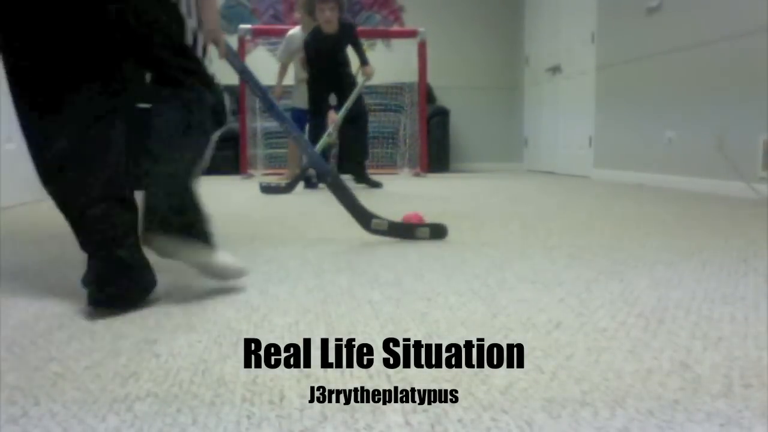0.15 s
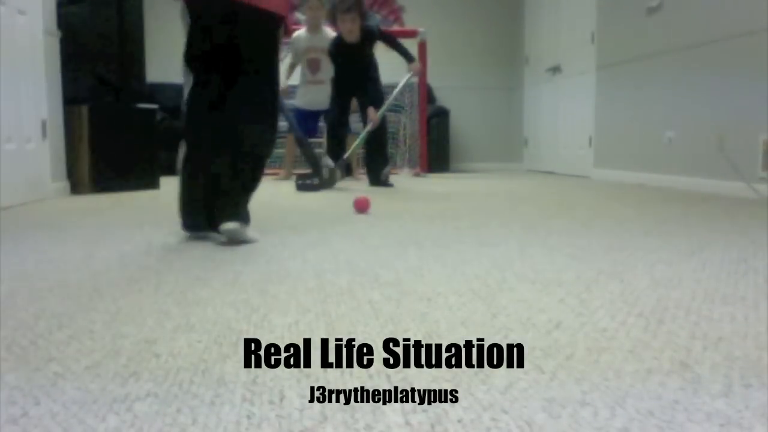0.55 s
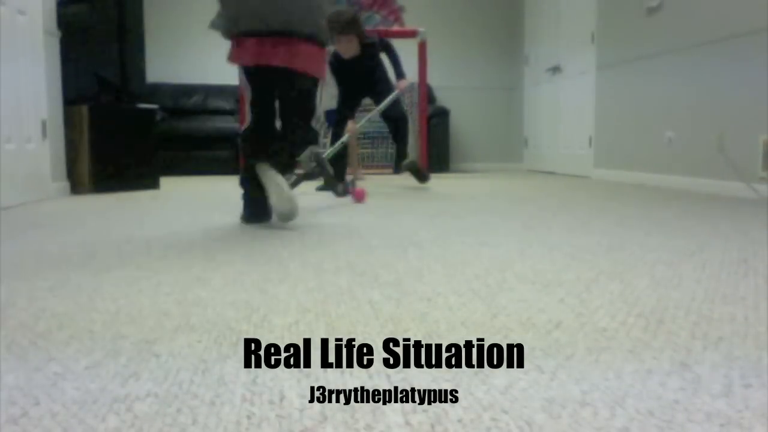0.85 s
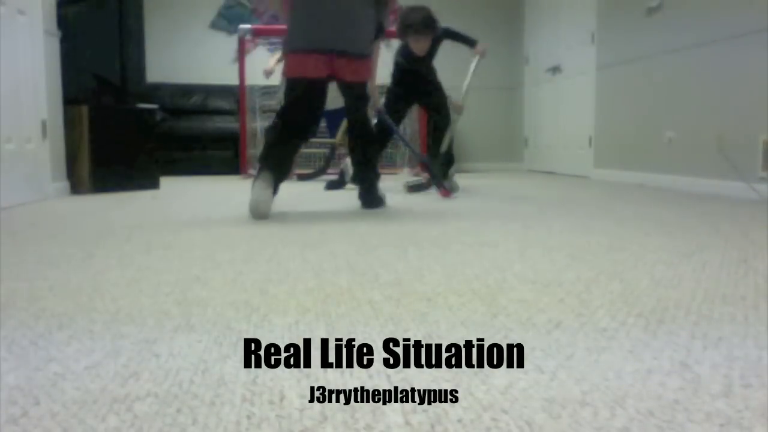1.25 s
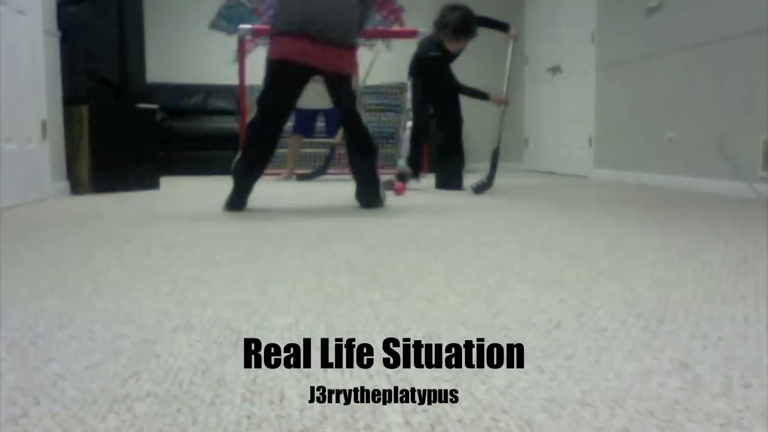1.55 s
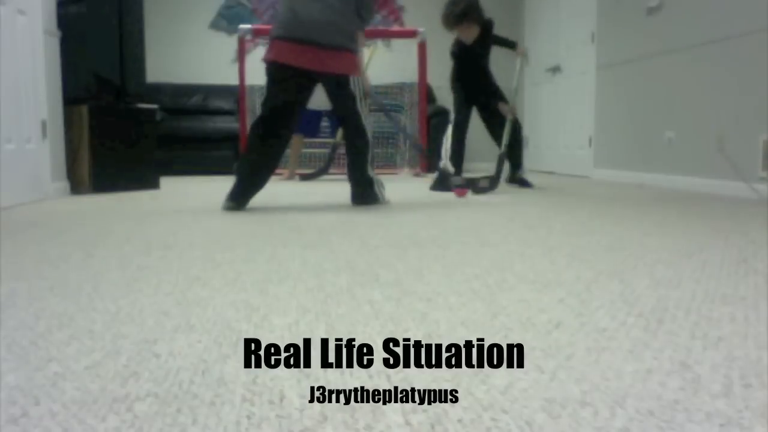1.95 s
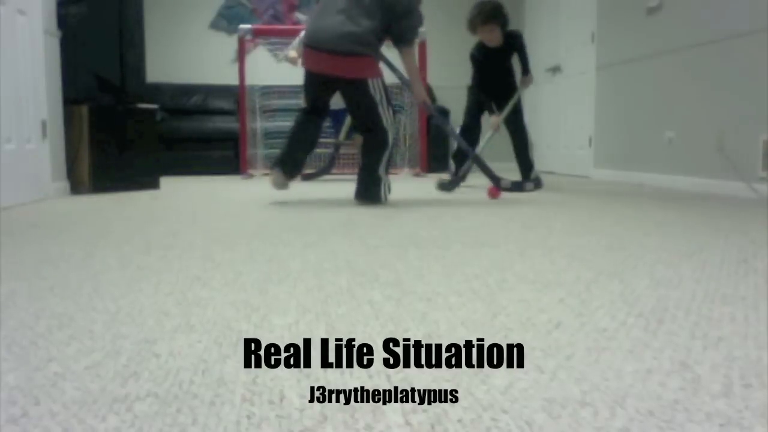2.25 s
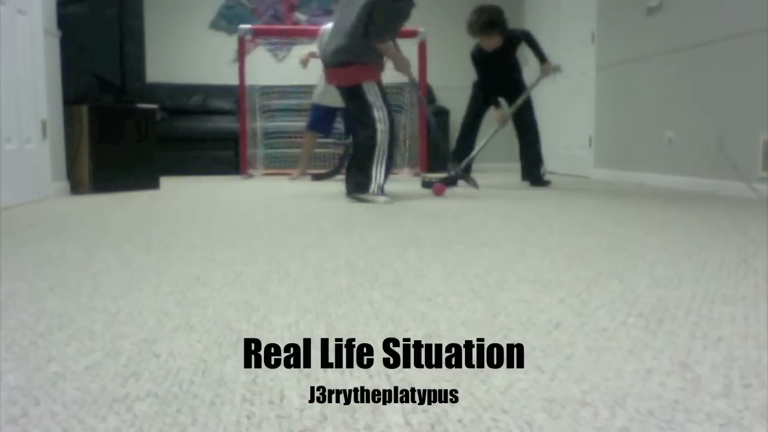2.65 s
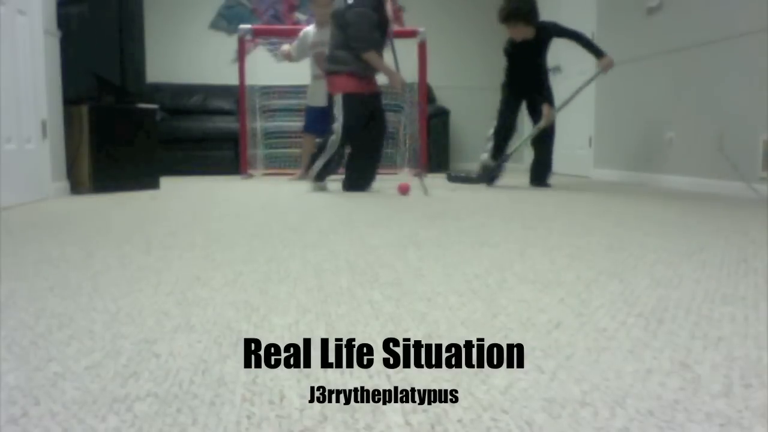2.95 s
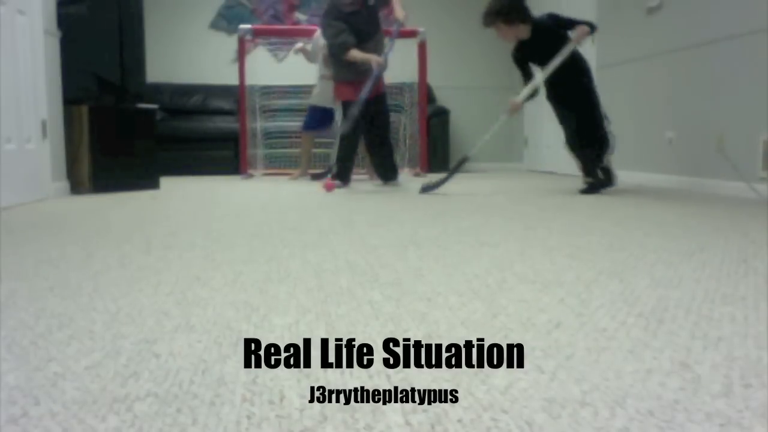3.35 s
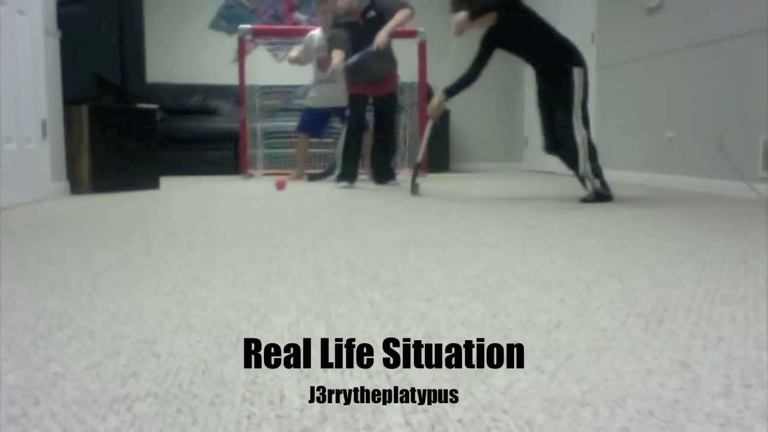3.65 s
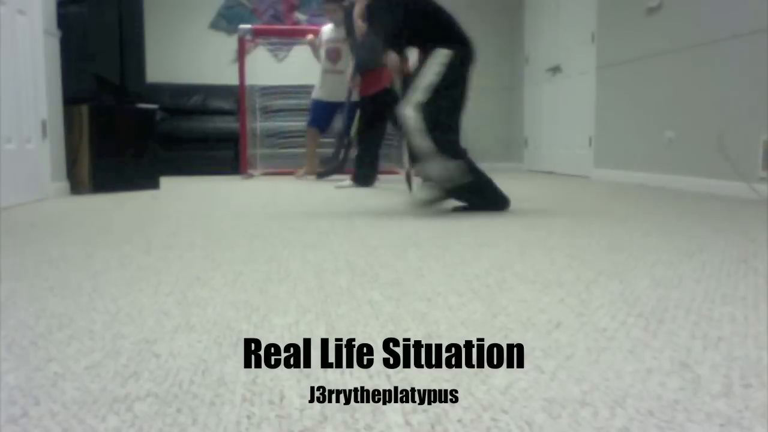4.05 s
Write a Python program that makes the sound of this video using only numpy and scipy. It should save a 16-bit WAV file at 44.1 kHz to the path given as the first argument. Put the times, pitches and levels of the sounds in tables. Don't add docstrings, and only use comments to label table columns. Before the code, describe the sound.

A small microphone on the floor of a carpeted room picks up floor hockey. Two quick clusters of plastic clacks and floor slaps come first, then a thin tick, a foot thud with clacks, and a hit on a light ball. A quieter stretch of soft scuffing follows, with a light double tap, before one very loud plastic clash and a heavy stomp close it.

```python
import sys
import numpy as np
from scipy import signal
from scipy.fft import rfft, irfft
from scipy.io import wavfile

SR = 44100
rng = np.random.default_rng(int(sys.argv[2]) if len(sys.argv) > 2 else 0)


def volts(x):
    e = np.asarray(x, float) / 20
    return 10 ** e


def dump_mix(stems):
    frames = np.atleast_2d(stems).T
    limited = np.clip(frames, -1, 1)
    pcm = np.round(limited * 32767).astype(np.int16)
    wavfile.write(sys.argv[1], SR, pcm)


N = 184645


def at_hz(points, hz):
    table_hz, values = np.transpose(points)
    return np.interp(np.log(hz + 1), np.log(table_hz), values)


def rms_one(x):
    return x / np.sqrt(np.mean(x ** 2) + 1e-20)


def energy_one(x):
    return x / np.sqrt(np.sum(x ** 2) + 1e-20)


def drift(rate_hz):
    pole = np.exp(-80 * np.pi * rate_hz / SR)
    draws = rng.standard_normal(N // 40 + 2002)
    slow = signal.lfilter([1], [1, -2 * pole, pole * pole], draws)[2000:]
    return np.interp(np.arange(N) / 40, np.arange(len(slow)), rms_one(slow))


def colour(x, spectrum):
    hz = np.fft.rfftfreq(len(x), 1 / SR)
    return irfft(rfft(x) * volts(at_hz(spectrum, hz)), len(x))


def band(x, low_hz, high_hz):
    edges = [low_hz, min(high_hz, 0.45 * SR)]
    return signal.sosfilt(signal.butter(2, edges, "band", fs=SR, output="sos"), x)


def patchy_noise(spectrum, patchy_db, rate_hz):
    edges = np.geomspace(spectrum[0][0], spectrum[-1][0], 9)
    noise = [colour(draw, spectrum) for draw in rng.standard_normal((2, N))]
    together = drift(rate_hz)
    out = np.zeros(N)
    for k, (low, high) in enumerate(zip(edges, edges[1:])):
        flicker_db = patchy_db * (together + 0.91 * drift(2 * rate_hz))
        out += band(noise[k % 2], low, high) * volts(flicker_db)
    return rms_one(out)


def standing_waves(x):
    # (frequency [Hz], t60 [s])
    room_modes = [(86, 0.37), (110, 0.31), (175, 0.32), (233, 0.24), (283, 0.96), (336, 0.28), (385, 0.43),
                  (480, 0.35), (590, 0.11)]
    out = np.zeros(len(x))
    for k, (hz, t60) in enumerate(room_modes):
        out += (-1) ** k * signal.lfilter(*signal.iirpeak(hz, hz * t60 / 1.75, fs=SR), x)
    return out


def room_echo(fade_s, build_up_s, sparse_db):
    # (frequency [Hz], t60 [s])
    room_t60 = [(100, 0.81), (300, 0.17), (700, 0.15), (1500, 0.38), (3000, 0.32), (6000, 0.42),
                (10000, 0.15), (15000, 0.19)]
    size = 12000
    t = np.arange(size) / SR
    uneven = volts(sparse_db * np.exp(-t / 0.048) * np.minimum(rng.exponential(1, size), 4))
    build_up = 1 - np.exp(-(t / build_up_s) ** 2)
    reflections = rng.standard_normal((2, size)) * uneven * build_up
    edges = np.geomspace(50, 18000, 10)
    out = np.zeros(size)
    for k, (low, high) in enumerate(zip(edges, edges[1:])):
        decay_db = -60 * t / at_hz(room_t60, np.sqrt(low * high))
        suppressed_db = -20 * (t / fade_s * (high / 5000) ** 0.41) ** 2.63
        out += band(reflections[k % 2], low, high) * volts(decay_db + suppressed_db)
    return energy_one(out)


def ring(hz, t60, rise_s):
    t = np.arange(2048) / SR
    return np.sin(2 * np.pi * hz * t) * volts(-60 * t / t60) * (1 - np.exp(-(t / rise_s) ** 2))


def add(out, s, sound, room_db, build_up_s):
    fade_s = 0.12 * (np.max(np.abs(sound)) / 0.027 + 0.011) ** 0.42
    heard = volts(room_db) * signal.fftconvolve(sound, room_echo(fade_s, build_up_s, sparse_db=6.0))
    heard[:len(sound)] += sound
    i = round(s * SR)
    out[i:i + len(heard)] += heard[:N - i]


def padded_blows(blows):
    out = np.zeros(N)
    for s, level_db, hz, t60, overtone_db, room_db in blows:
        low_mode = ring(hz, t60, rise_s=0.66 / hz)
        overtone = ring(1.95 * hz, 0.61 * t60, rise_s=0.51 / hz)
        blow = low_mode + volts(overtone_db) * overtone
        add(out, s, volts(level_db + 3) * blow, room_db, build_up_s=0.0047)
    with_room = out + volts(-4.0) * standing_waves(out)
    return band(band(with_room, 60, 910), 51, 1200)


def plastic_hits(hits, room_db):
    # (frequency [Hz], density [dB per Hz])
    snap = [(1530, -2), (2600, -4), (2930, -3), (3380, 0), (3700, -2), (4230, 0.5), (5460, -1),
            (6160, -7.5), (6900, -6), (9660, -16), (13500, -22), (15600, -15)]
    out = np.zeros(N)
    hz_axis = np.fft.rfftfreq(2048, 1 / SR)
    for s, clack_db, hz, crack_db, tilt_db in hits:
        clack = ring(hz, 0.0034, rise_s=0.00053) + 0.5 * ring(1.355 * hz, 0.0044, rise_s=0.00056)
        top_loss_db = 4.5 * min(crack_db + 17, 0) * np.log2(np.maximum(hz_axis / 11500, 1))
        tilted_db = tilt_db * np.log2(hz_axis / 7000 + 0.078)
        shape = volts(at_hz(snap, hz_axis) + tilted_db + top_loss_db)
        shape = shape / (1 + (0.62 * hz / (hz_axis + 1)) ** 9)
        crack = energy_one(np.roll(irfft(shape), 48))
        hit = volts(clack_db + 6.0) * clack + volts(crack_db + 14) * crack
        add(out, s, hit, room_db, build_up_s=0.0009)
    return band(out, 600, 19000)


def footfall_rumble():
    # (frequency [Hz], density [dB per Hz])
    rumble_spectrum = [(15, -70), (25, -51), (74, -4.5), (204, -6.5), (237, 2), (284, -11), (330, -3),
                       (437, -16), (550, -21.5), (660, -19), (1300, -31.5), (1690, -46), (2860, -120)]
    # (time [s], level [dB])
    footfall = [(0.0, -57), (0.35, -57), (0.62, -63), (0.91, -60), (1.23, -61.5), (1.4, -58), (1.7, -59),
                (1.95, -64.5), (2.15, -64), (2.44, -60), (2.86, -68), (3.22, -56), (3.68, -59.5),
                (3.91, -62.5), (4.1, -54)]
    shake = patchy_noise(rumble_spectrum, patchy_db=2.5, rate_hz=9.4)
    level_db = np.interp(np.arange(N) / SR, *np.transpose(footfall))
    return volts(level_db) * rms_one(shake + volts(1.5) * standing_waves(shake))


def carpet_and_cloth():
    # (frequency [Hz], density [dB per Hz])
    brush_spectrum = [(530, 6), (900, -9), (986, -5), (1200, -9.5), (1360, -1), (2760, 0.5), (4300, -1),
                      (5590, -16), (9460, -120)]
    # (frequency [Hz], density [dB per Hz])
    rustle_spectrum = [(2470, -31), (4200, -1.5), (5170, -5), (6720, -8), (8500, -13.5), (10400, -20),
                       (12000, -29), (13500, -30), (15500, -44)]
    # (middle [s], length [s], brush level [dB], rustle over brush [dB])
    sweeps = [(0.047, 0.68, -74.5, -2), (0.337, 0.21, -68.5, -6), (0.466, 0.31, -77, -3),
              (0.82, 0.55, -96, 5), (1.039, 0.12, -74, -5), (1.181, 0.2, -63.5, -10),
              (1.407, .3, -68.5, -4.5), (1.573, 0.41, -69, -8.5), (1.732, 0.26, -69, -13),
              (2.047, 0.19, -76, -6), (2.169, 0.091, -82, 2), (2.307, 0.5, -74.5, -1.5),
              (2.537, 0.23, -76.5, -1), (2.824, 0.16, -89, 3), (3.08, 0.33, -75.5, 4.5),
              (3.24, 0.27, -68, -2), (3.433, 0.57, -71, -2), (3.599, 0.098, -56.5, -23),
              (3.639, 0.2, -74, -4), (3.971, 0.2, -62, -4.5), (4.091, 0.11, -67, -2),
              (4.135, 0.028, -53, -3), (4.18, 0.12, -50, -19)]
    t = np.arange(N) / SR
    brush, rustle = volts(-78), volts(-81.5)
    for s, length_s, brush_db, rustle_db in sweeps:
        swell = np.cos(np.pi * np.clip((t - s) / length_s, -0.5, 0.5)) ** 2
        brush = brush + volts(brush_db) * swell ** 1.42
        rustle = rustle + volts(brush_db + rustle_db) * swell
    brushing = brush * patchy_noise(brush_spectrum, patchy_db=0.7, rate_hz=36)
    return brushing + rustle * patchy_noise(rustle_spectrum, patchy_db=0.67, rate_hz=27)


def floor_slaps():
    # (time [s], level [dB], frequency [Hz], room echo [dB])
    slaps = [(0.167, -23.5, 412, -4.5), (0.182, -51, 383, -17), (0.193, -29, 328, -3.5),
             (0.214, -32, 453, -3), (0.376, -21.5, 367, 4.5), (0.385, -22, 417, -16),
             (0.397, -39, 284, -11), (0.411, -32, 203, -4), (1.247, -28, 267, -15), (1.26, -27, 341, -0.8),
             (1.672, -33.5, 318, 7), (1.681, -28, 376, -2.5), (2.251, -48.5, 240, 7.5),
             (3.07, -26.5, 335, 3), (3.085, -44.5, 260, 9), (3.412, -45, 213, -0.5), (3.58, -47, 337, -0.5),
             (3.812, -14.5, 381, 0.5), (3.826, -19, 269, -2.5), (3.82, -34, 420, 0),
             (3.855, -22.5, 328, .6)]
    return padded_blows([(s, db, hz, 6.46 / hz, -1.5, room_db) for s, db, hz, room_db in slaps])


def clacks():
    # (time [s], clack level [dB], clack frequency [Hz], crack level [dB], crack tilt [dB per octave])
    facing = [(0.169, -27, 2670, -39, 3), (0.1758, -24, 2665, -30.5, -2.5), (0.182, -36, 3320, -37.5, 8.5),
              (0.1923, -43, 2640, -41.5, 7), (0.3857, -39.5, 2500, -63, 3), (0.4513, -56, 1990, -60, 0),
              (0.851, -70, 4200, -57, -1), (0.8604, -50, 4300, -37, -0.5), (0.8634, -51, 4300, -47.5, -3),
              (1.254, -31.5, 1870, -41, 16), (1.6724, -38, 3570, -36, 4.5), (1.6843, -59, 3770, -44, 6),
              (2.2532, -51, 4800, -50.5, -10), (2.2611, -41.5, 3540, -65, 0),
              (3.0697, -37.5, 2900, -33, 6.5), (3.8165, -10, 2690, -13.5, 3),
              (3.8272, -15.5, 1685, -20.5, -5), (3.831, -22, 2900, -23.5, 10.5)]
    return plastic_hits(facing, room_db=4)


def blade_knocks():
    # (time [s], level [dB], frequency [Hz])
    knocks = [
        (0.169, -30, 473),
        (0.373, -26.5, 577),
        (0.385, -43, 454),
        (1.673, -32, 427),
        (3.058, -42, 490),
        (3.812, -20.5, 503),
        (4.128, -29, 465),
        (4.137, -39, 612),
        (4.157, -35, 586),
    ]
    return padded_blows([(s, db, hz, 0.019, -29, 1.5) for s, db, hz in knocks])


def ball_and_shaft_ticks():
    # (time [s], level [dB], frequency [Hz])
    ticks = [(0.171, -36.5, 1200), (0.1702, -36, 2550), (0.377, -38.5, 1270), (0.387, -50, 1140),
             (0.3957, -54, 1270), (1.1984, -42, 1610), (1.253, -42, 1860), (1.2665, -33.5, 2360),
             (1.6817, -41, 1500), (3.0724, -51, 2670), (3.8165, -8, 2470), (3.8274, -19.5, 1665),
             (4.14, -44, 1900), (3.075, -43.5, 1340), (0.1692, -42, 1730)]
    out = np.zeros(N)
    for s, level_db, hz in ticks:
        tick = volts(level_db - 2.5) * ring(hz, 0.014, rise_s=0.00055)
        add(out, s, tick, room_db=-12.5 - 0.26 * level_db, build_up_s=0.0028)
    return band(out, 600, 19000)


def hidden_clacks():
    # (time [s], clack level [dB], clack frequency [Hz], crack level [dB], crack tilt [dB per octave])
    hidden = [
        (0.374, -48, 1520, -77, 9.5),
        (0.8557, -64, 4340, -42, -0.5),
        (0.8634, -53, 4200, -63, -3),
        (1.25, -36.5, 3420, -46.5, 8),
        (1.2649, -33, 3760, -35.5, 1.5),
        (3.0837, -36.5, 2610, -42.5, 1.5),
        (3.8119, -26, 2330, -27.5, -3.5),
        (4.138, -39.5, 1980, -46.5, -1),
    ]
    return plastic_hits(hidden, room_db=9)


def footsteps():
    # (time [s], level [dB], frequency [Hz], ring t60 [s], room echo [dB])
    steps = [(0.392, -20.5, 91, 0.03, -23), (0.454, -48, 355, .025, 6.5), (1.19, -29, 224, 0.042, -4),
             (1.199, -15, 279, 0.017, -9), (2.29, -62, 203, 0.023, 8), (2.308, -40.5, 82, 0.05, -7),
             (2.641, -52, 233, 0.038, -8), (2.741, -49.5, 245, 0.042, -12), (3.053, -35, 410, 0.013, 7),
             (3.087, -41.5, 178, 0.063, 1.7), (3.362, -44, 244, 0.052, 2.1), (3.455, -52, 289.4, 0.15, 1.5),
             (3.491, -57.5, 306, 0.14, -10), (3.82, -41, 172, .055, -3), (4.128, -16.5, 307, 0.046, 1.5),
             (4.132, -21.5, 340, 0.042, -6), (4.14, -15.5, 292, 0.033, 2.5), (4.14, -24, 186, 0.1, -8),
             (4.152, -30.5, 112, .08, -6), (4.157, -8.5, 249, 0.019, 1.5), (4.179, -20.5, 274, 0.065, -4)]
    return padded_blows([(s, db, hz, t60, -11, room_db) for s, db, hz, t60, room_db in steps])


def squeaks():
    # (start [s], length [s], frequency [Hz], level [dB])
    slides = [(0.415, 0.0085, 7700, -67), (0.415, .012, 11300, -80), (0.467, 0.01, 7800, -77),
              (1.148, 0.036, 6300, -68), (2.127, 0.067, 5070, -72), (2.36, 0.071, 7400, -79),
              (2.738, 0.11, 7300, -80.5), (2.988, .05, 4950, -73), (3.574, .05, 2100, -57.5),
              (3.2, 0.096, 6350, -65.5), (3.552, 0.079, 5200, -68), (4.158, 0.023, 11030, -60.5)]
    out = np.zeros(N)
    for s, length_s, hz, level_db in slides:
        size = round(length_s * SR)
        whistle = band(rng.standard_normal(8192), hz - 160, hz + 160)[:size]
        out[round(s * SR):][:size] += volts(level_db) * rms_one(whistle) * np.hanning(size)
    return out


def microphone(x):
    # (frequency [Hz], width [Hz], depth [dB])
    housing_dips = [(1120, 370, 0), (4246, 1100, -12.5)]
    for hz, width_hz, dip_db in housing_dips:
        x = x - (1 - volts(dip_db)) * signal.lfilter(*signal.iirpeak(hz, hz / width_hz, fs=SR), x)
    return signal.sosfilt(signal.butter(3, 50, "high", fs=SR, output="sos"), x)


def scene():
    between_blows = footfall_rumble() + carpet_and_cloth() + squeaks()
    low_blows = floor_slaps() + blade_knocks() + footsteps()
    plastic = clacks() + ball_and_shaft_ticks() + hidden_clacks()
    return microphone(between_blows + low_blows + plastic)[None]


def roll_off(x):
    return signal.sosfilt(signal.butter(12, 15770, fs=SR, output="sos"), x)


def record(dry):
    mix = signal.sosfilt(signal.cheby2(24, 90, 15900, fs=SR, output="sos"), dry)
    return roll_off(mix)


dry = scene()
out = record(dry)
dump_mix(out)
```